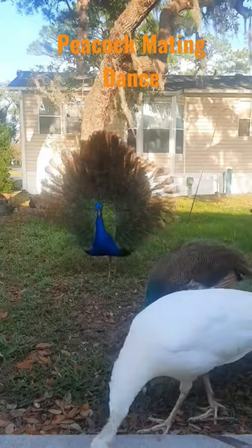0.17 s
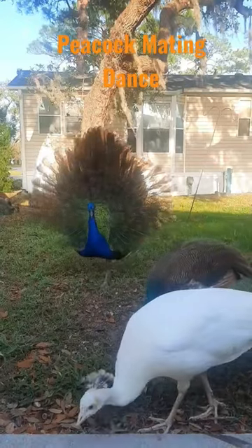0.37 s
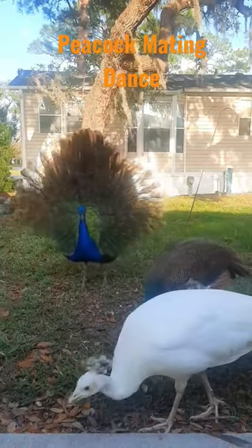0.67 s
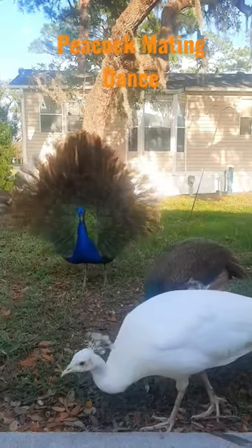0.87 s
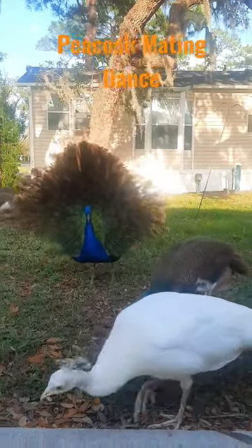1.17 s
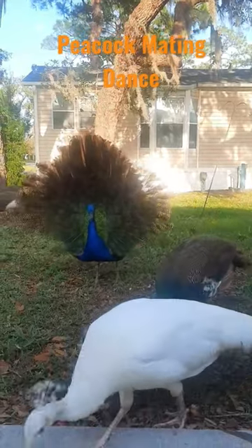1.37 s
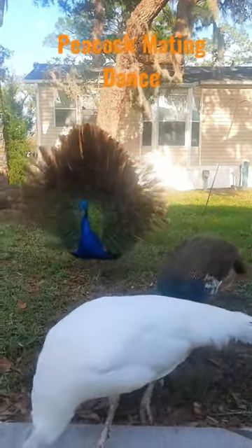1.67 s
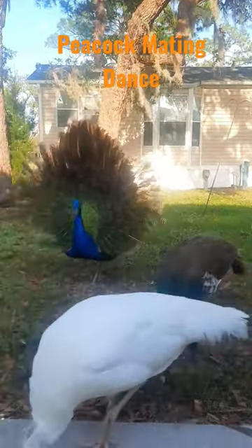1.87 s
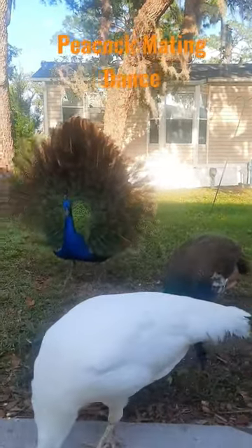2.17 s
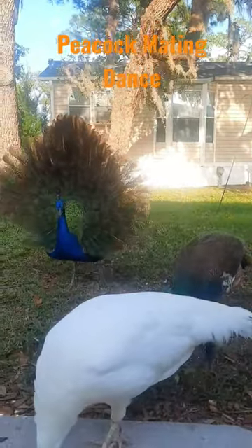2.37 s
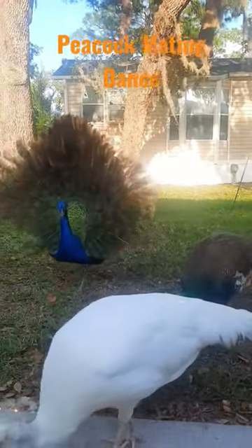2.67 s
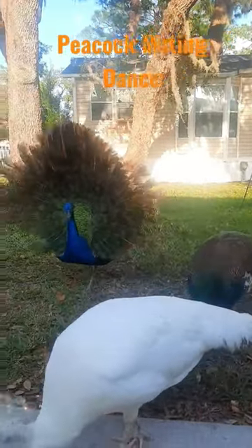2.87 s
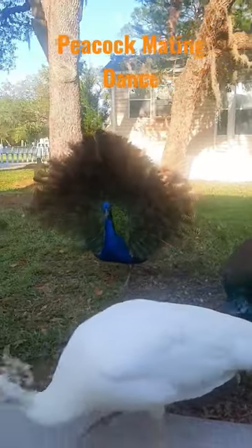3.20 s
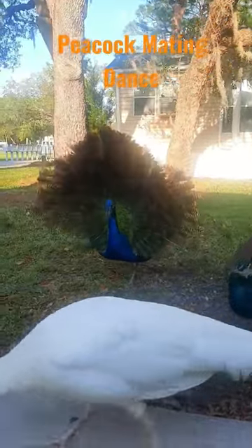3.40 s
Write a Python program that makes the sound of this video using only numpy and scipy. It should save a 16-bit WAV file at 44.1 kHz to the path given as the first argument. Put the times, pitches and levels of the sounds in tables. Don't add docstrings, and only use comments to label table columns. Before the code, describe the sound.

Dry, rattling feather shakes come twice on a lawn, with a few early beak clicks, then quick close pecks in the last part, over a quiet low drone and soft outdoor hush, in stereo.

```python
import sys
import numpy as np
from scipy import signal
from scipy.io import wavfile

SR = 44100
rng = np.random.default_rng(int(sys.argv[2]) if len(sys.argv) > 2 else 0)


def to_wav(sig):
    pcm = np.clip(np.atleast_2d(sig), -1, 1) * 32767
    pcm = np.round(pcm).astype(np.int16)
    wavfile.write(sys.argv[1], SR, pcm.T)


def field_ratio(decibels):
    return 10 ** (np.asarray(decibels, dtype=float) / 20)


N = 156114

# t/s, level/dB
TAIL_SHAKE = [(.2, -69), (.4, -58.5), (.78, -72), (.83, -60.5), (1.0, -58.5), (1.12, -46), (1.23, -42),
              (1.36, -44.5), (1.48, -53.5), (1.7, -59.5), (2.1, -64), (2.5, -59.5), (2.9, -55.5),
              (3.06, -47), (3.2, -47), (3.3, -42), (3.39, -44), (3.54, -43.5)]


def in_time(rows):
    s, *columns = np.transpose(rows)
    return [np.interp(np.arange(N) / SR, s, c) for c in columns]


def at_hz(points, hz):
    table_hz, value = np.array(points).T
    return np.interp(np.log(hz), np.log(table_hz), value)


def rms_one(x):
    return x / np.sqrt(np.mean(x ** 2) + 1e-20)


def drift(rate_hz):
    step = 40
    r = np.exp(-2 * np.pi * step * rate_hz / SR)
    noise = rng.standard_normal(N // step + 2002)
    slow = signal.lfilter([1], [1, -2 * r, r * r], noise)[2000:]
    return np.interp(np.arange(N) / step, np.arange(len(slow)), rms_one(slow))


def resonate(x, hz, width_hz):
    r = np.exp(-np.pi * width_hz / SR)
    poles = [1, -2 * r * np.cos(2 * np.pi * hz / SR), r * r]
    return signal.lfilter(np.array([1, 0, -1]) * (1 - r * r) / 2, poles, x)


def twice(x, hz, width_hz):
    return resonate(resonate(x, hz, width_hz), hz, width_hz)


def breathy(hz, width_hz, own_share=0.52):
    shared, *own = rng.standard_normal((3, N))
    return rms_one(twice(shared + own_share * np.array(own), hz, width_hz))


def coloured(source, spectrum, patchy_db, fast_hz):
    # f/Hz, likeness (held to 0-1)
    likeness = [(25, 4), (60, 1.35), (125, .94), (300, 1), (600, 0.84), (1200, 0.17), (2500, 0.35),
                (6000, 0.01)]
    # f/Hz, level/dB
    lean = [(25, 4.3), (125, 0.61), (500, 4.3), (1000, 3.9), (2000, 3.3), (4000, 2.6), (10000, 0.18)]
    out, together = 0, drift(2.5)
    edges = 24 * 2 ** np.arange(0, 9.7, .4)
    for k, (low, high) in enumerate(zip(edges, edges[1:])):
        hz = np.sqrt(low * high)
        if hz < spectrum[0][0]:
            continue
        band = signal.butter(2, [low, high], "band", fs=SR, output="sos")
        shared, *own = signal.sosfilt(band, source[k % 2])
        alike = np.clip(at_hz(likeness, hz), 0, 1)
        ports = np.sqrt(alike) * shared + np.sqrt(1 - alike) * np.array(own)
        gain = field_ratio(at_hz(spectrum, hz) + patchy_db * (0.2 * together + drift(fast_hz)))
        sides = field_ratio(at_hz(lean, hz) / 2 * np.array([[1], [-1]]))
        out = out + gain * sides * ports
    return rms_one(out)


def breeze():
    air = rng.standard_normal((2, N))
    return field_ratio(-57) * rms_one(twice(air, 55, 40)) * field_ratio([[2.5], [-2.5]])


def neighbourhood_air():
    # f/Hz, level/dB per Hz
    hush = [(25, -38), (60, -4.5), (105, -2), (170, -10), (220, -12), (300, -16.5), (400, -15.5),
            (700, -22),
            (1500, -26), (2400, -32.5), (3500, -32), (6000, -39.5), (10000, -45), (13500, -48.5),
                 (16000, -42)]
    noise = rng.standard_normal((2, 3, N))
    return field_ratio(-44.5) * coloured(noise, hush, patchy_db=1.62, fast_hz=11.4)


def far_engine():
    # t/s, firing f/Hz, level/dB, partner level/dB
    drone = [
        (0.22, 109.5, -41.5, -0.5),
        (0.86, 109.8, -39.5, -9.5),
        (1.25, 111.6, -50.5, -6.5),
        (2.17, 115.7, -43.5, -3),
        (2.75, 115.1, -40.5, -12),
        (2.86, 117.4, -51, -18),
        (3.41, 118.1, -42.5, -12),
        (3.5, 119.2, -46.5, 7),
        (3.54, 115, -47, -9),
    ]
    hz, db, partner_db = in_time(drone)
    turn = np.cumsum(2 * np.pi * hz * (1 + 0.0113 * drift(5.6)) / SR)
    wobble_db = 2.5
    main = field_ratio(wobble_db * drift(8.6)) * np.sin(turn)
    partner = field_ratio(partner_db - 2.5 + wobble_db * drift(15)) * np.sin(1.4 * turn)
    return field_ratio(db - 0.5) * (main + partner)


def fan():
    # multiple of the turning rate, level/dB
    motor_lines = [(1.0, -49), (3.0, -55), (5.0, -60), (13.0, -66), (22.0, -69.5), (24.0, -66), (25.0, -72),
                   (25.77, -71)]
    turn_hz, wobble_db = 83.1, 1.5
    turn = np.cumsum(2 * np.pi * turn_hz * (1 + 0.0003 * drift(1.23)) / SR)
    lines = 0
    for multiple, db in motor_lines:
        level = field_ratio(db + 1.66 + wobble_db * drift(2.9))
        lines = lines + level * np.sin(multiple * turn + rng.uniform(0, 2 * np.pi))
    whine = field_ratio(-65.5 + 3.2 * drift(8)) * breathy(1880, 690)
    casing = field_ratio(-62 + 1.3 * drift(2.4)) * breathy(995, 370)
    return lines + whine + casing


def tail_swish():
    level_db, = in_time(TAIL_SHAKE)
    whoosh = breathy(299, 101, own_share=0.34)
    swell = field_ratio(-52 + 0.25 * (level_db + 49) + 0.75 * drift(7.8))
    return swell * whoosh * field_ratio([[1.2], [-1.2]])


def ring(burst, modes):
    return sum(field_ratio(db) * (-1) ** k * resonate(burst, hz, width) for k, (hz, width, db) in enumerate(modes))


def pecks():
    # loudest click t/s, level/dB, rise/s, fall/s, brightness/dB
    peck_events = [(0.3992, -43.5, .001, 0.0019, -8), (.409, -53.5, .001, 0.0018, 1.5),
                   (0.812, -57, 0.0018, 0.032, -2), (2.211, -55.5, .002, .003, -19),
                   (2.223, -53.5, .002, 0.0073, -6), (2.635, -51, .0007, 0.0033, 2),
                   (2.6388, -41, 0.0007, 0.0033, -3), (2.73, -44, 0.00084, 0.0052, 5.5),
                   (2.737, -46, .003, .003, 2), (2.82, -47, .003, 0.0035, 0),
                   (2.826, -40, 0.0017, 0.0035, 3), (2.92, -44.5, .004, 0.0036, -1),
                   (3.058, -47, 0.0011, 0.0051, -.3), (3.064, -42.5, 0.0029, .003, 6),
                   (3.249, -50, .003, 0.0054, 7), (3.415, -41, .001, .002, -10),
                   (3.423, -41, 0.00092, 0.01, 2)]
    # f/Hz, width/Hz, level/dB
    beak_modes = [(1970, 1200, -7), (4200, 880, -2.5), (5650, 790, 0.5), (7130, 2000, -4.5),
                  (9500, 2000, -10)]
    # f/Hz, width/Hz, level/dB
    grit_modes = [(11560, 2000, -8), (12900, 1500, 0), (14630, 1540, -2)]
    click_gap_s, click_fade_s, click_spread_db, scratch_db = .0024, .0006, 2.5, -4
    t, out = np.arange(N) / SR, np.zeros((2, N))
    for s, db, rise_s, fall_s, bright_db in peck_events:
        i = slice(int((s - .03) * SR), min(int((s + .06) * SR), N))
        u = t[i] - s
        order = np.arange(-12, 25)
        at = (order + rng.uniform(-.3, .3, 37) * (order != 0)) * click_gap_s
        size = field_ratio(-np.abs(rng.normal(0, click_spread_db, 37)) * (at != 0))
        late = u - at[:, None]
        each = size[:, None] * (late >= 0) * np.exp(-np.abs(late) / click_fade_s)
        clicks = each.sum(axis=0) + field_ratio(scratch_db)
        swell = np.exp(np.where(u < 0, u / rise_s, -u / fall_s))
        shared, left, right = rng.standard_normal((3, len(u)))
        burst = field_ratio(db) * swell * clicks * (0.42 * shared + 0.81 * np.array([left, right]))
        out[:, i] += ring(burst, beak_modes) + field_ratio(bright_db) * ring(burst, grit_modes)
    return field_ratio(14) * out * field_ratio([[-.5], [.5]])


def tail_rustle():
    # f/Hz, level/dB per Hz
    quill_colour = [(250, -14), (600, -3), (1500, -1.5), (3000, -4.5), (6000, -6), (9500, -10.5),
                    (13500, -8.5), (16000, -15)]
    # f/Hz, width/Hz, gain
    shaft_modes = [(1080, 67, 0.21), (2300, 620, 0.36), (4900, 540, 0.28)]
    rubs_per_s, rub_spread_db, throb_hz, throb_db = 9000, 2, 53, 1
    shape = (2, 3, N)
    hits = rng.random(shape) < rubs_per_s / SR
    rubs = hits * field_ratio(rub_spread_db * rng.exponential(1, shape)) * rng.choice([-1, 1], shape)
    throb = throb_db * np.sin(np.cumsum(2 * np.pi * throb_hz * (1 + 0.045 * drift(5.8)) / SR))
    level_db, = in_time(TAIL_SHAKE)
    quills = coloured(rubs, quill_colour, patchy_db=0.72, fast_hz=11)
    shafts = 0
    for hz, width, gain in shaft_modes:
        flicker = field_ratio(2.5 * drift(18))
        shafts = shafts + gain * flicker * resonate(quills, hz, width)
    return field_ratio(level_db + throb + .5 * drift(44)) * (quills + shafts)


def scene():
    hum = far_engine()
    hum_ports = np.array([hum, np.roll(hum, 16)])
    machines = (fan() + hum_ports) * field_ratio([[.9], [-.9]])
    birds = tail_swish() + pecks() + tail_rustle()
    left, right = breeze() + neighbourhood_air() + machines + birds
    return np.array([left, np.roll(right, 4)])


def low_pass(x):
    return signal.sosfilt(signal.butter(12, 16450, fs=SR, output="sos"), x)


def record(dry):
    t = np.arange(N) / SR
    start_s, unmute_s, wake_s = .2043, .001, .17
    treble = signal.sosfilt(signal.butter(1, 6100, "high", fs=SR, output="sos"), dry)
    asleep = np.clip(1 - (t - start_s) / wake_s, 0, 1) ** .5
    heard = dry - 0.19 * resonate(dry, 9750, 480) - 0.36 * treble * asleep
    cut = signal.sosfilt(signal.ellip(8, .3, 42, 15350, fs=SR, output="sos"), heard)
    lead_in = field_ratio(-32) * np.clip((t - .184) / .012, 0, 1)
    gate = np.maximum(np.clip((t - start_s) / unmute_s, 0, 1), lead_in)
    return low_pass(cut * gate)


dry = scene()
out = record(dry)
to_wav(out)
```